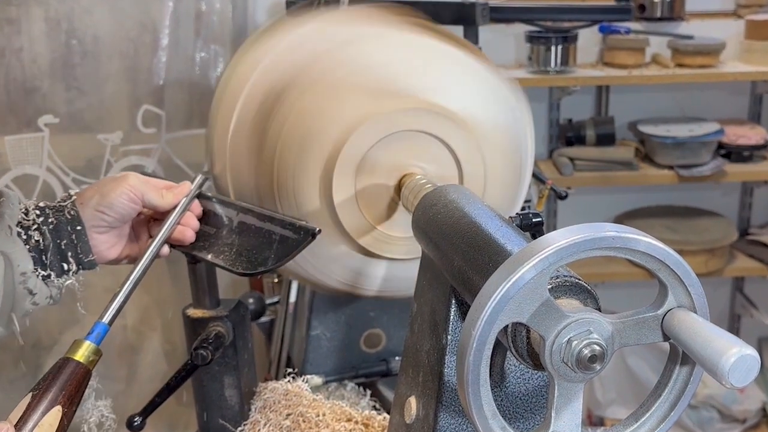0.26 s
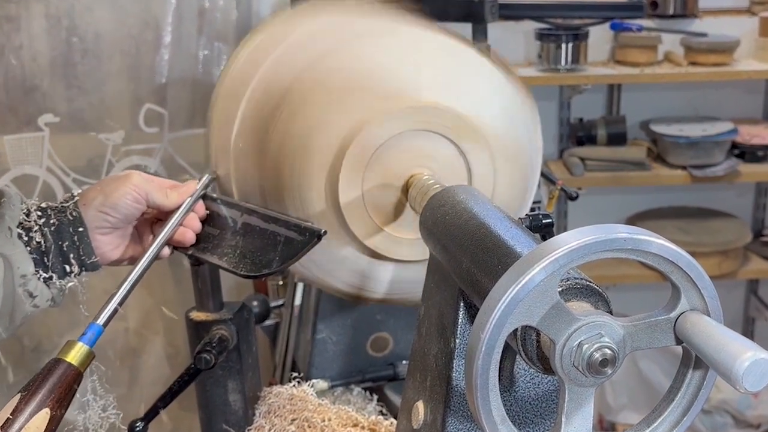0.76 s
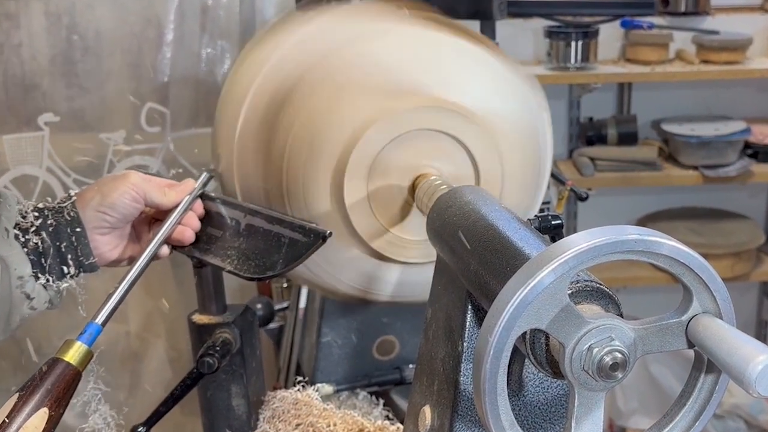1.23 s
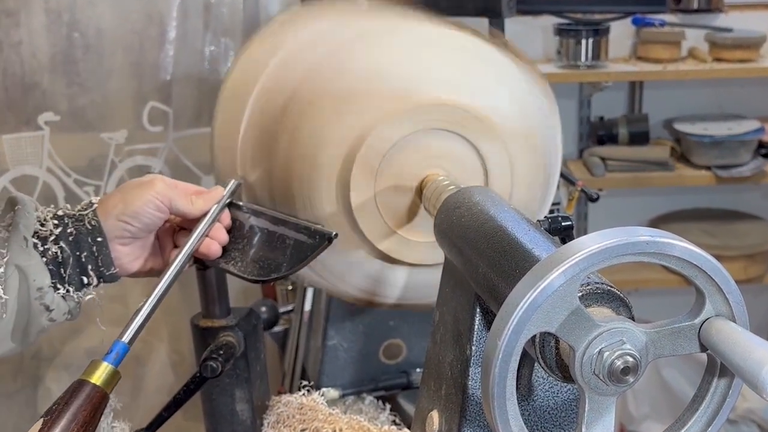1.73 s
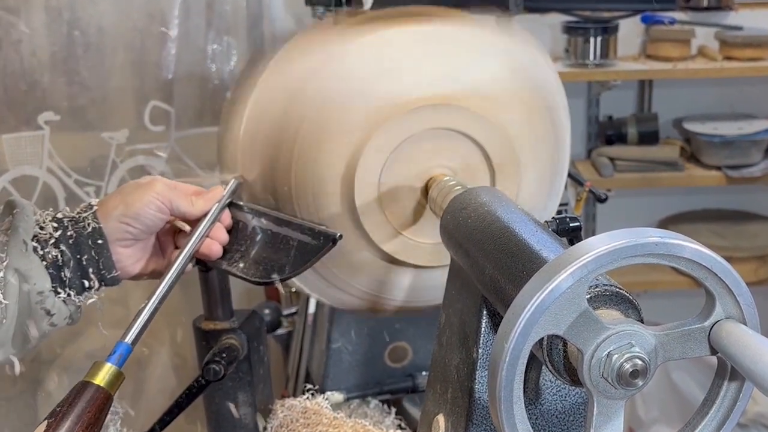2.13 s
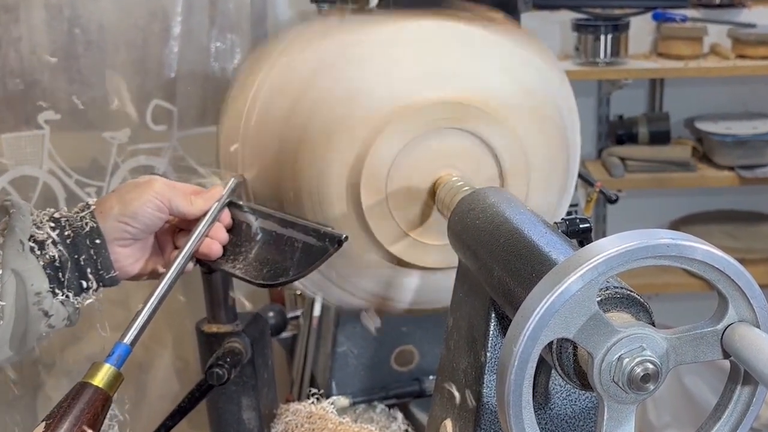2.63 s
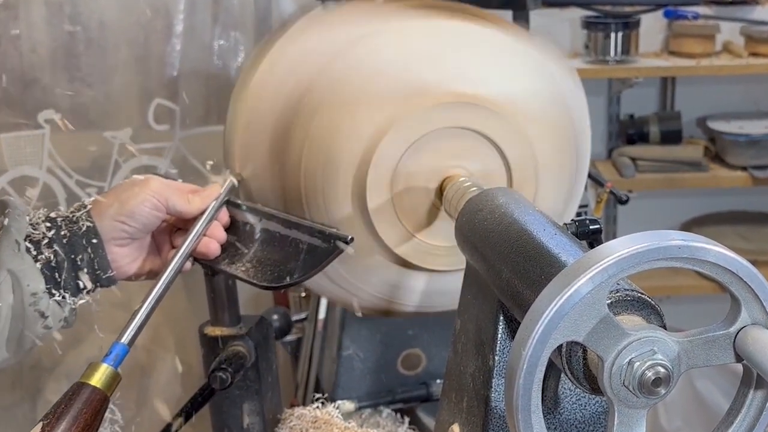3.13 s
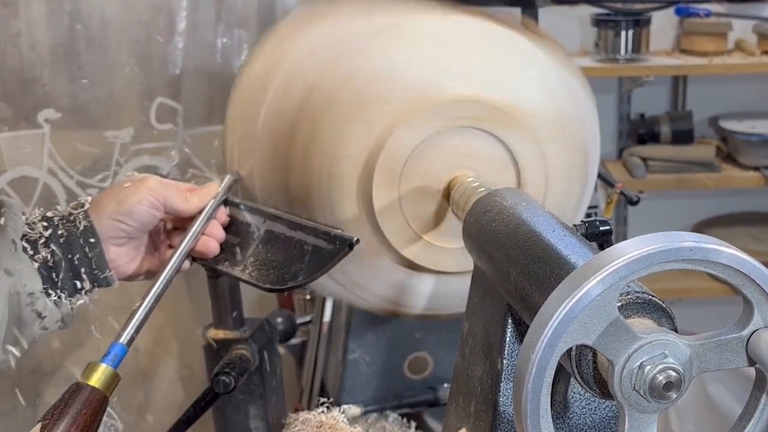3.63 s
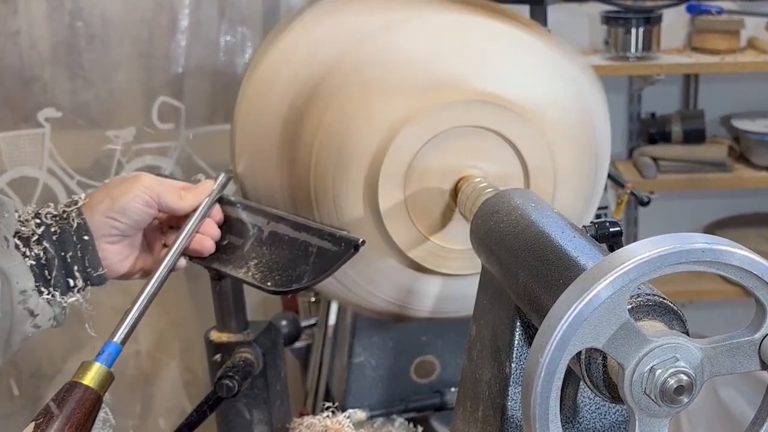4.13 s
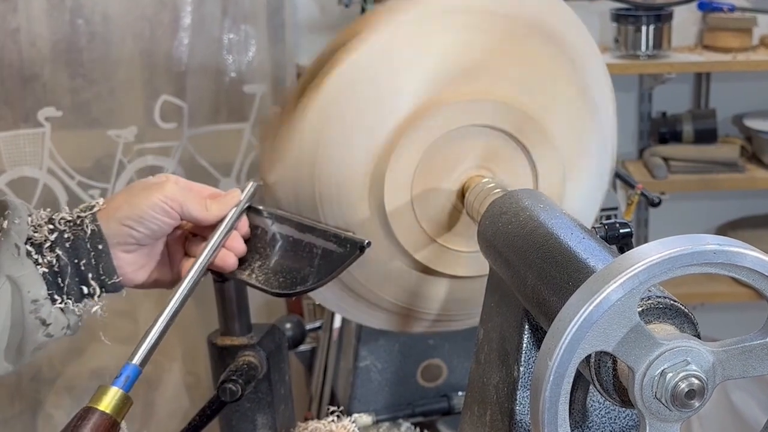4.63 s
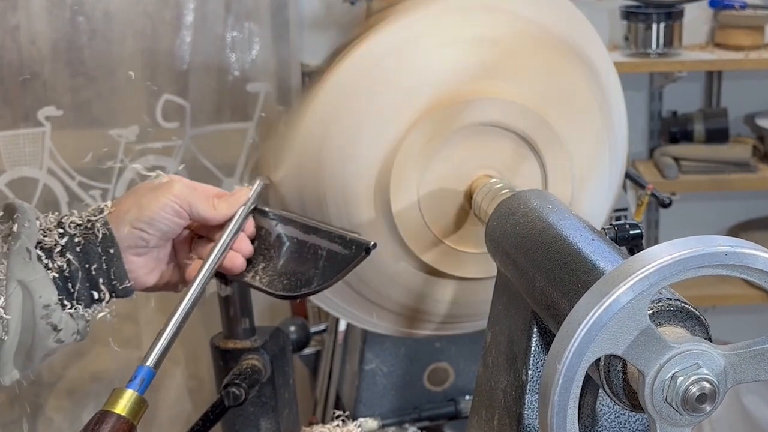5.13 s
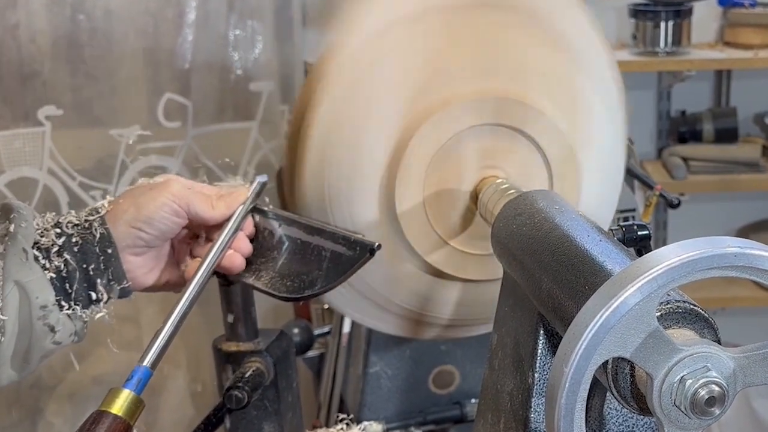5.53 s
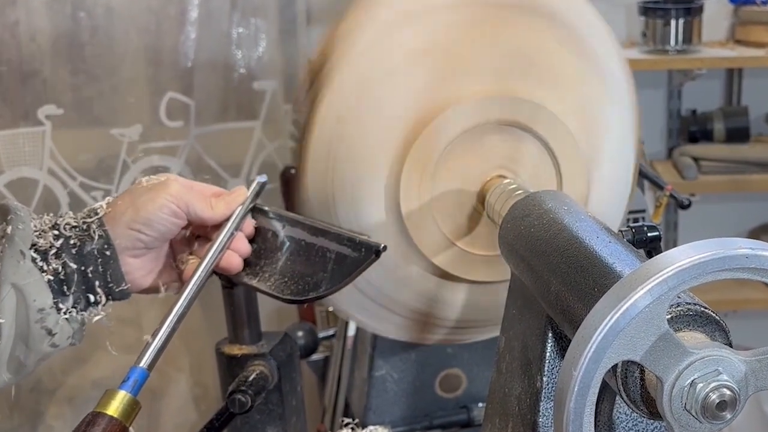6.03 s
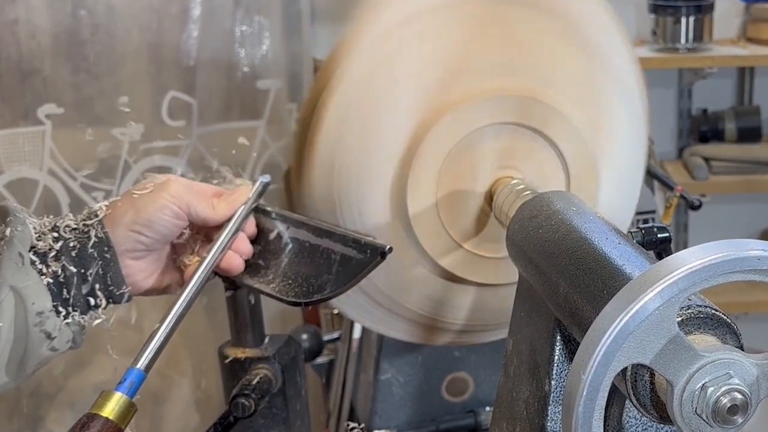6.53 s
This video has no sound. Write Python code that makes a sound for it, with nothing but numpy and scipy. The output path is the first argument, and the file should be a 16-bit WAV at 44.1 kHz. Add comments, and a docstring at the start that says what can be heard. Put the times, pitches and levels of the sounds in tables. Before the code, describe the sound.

In a workshop, a steel gouge cuts an uneven wooden bowl spinning on a lathe. Short, choppy passes with rapid knocking come first. After a brief pause, a longer, louder cut hisses and rasps with a fast flutter, then lighter passes return with bursts of sharp clicks. The tool rest hums and rattles slightly, and a faint motor whine continues underneath. The sound is close and fairly dry.

```python
"""A workshop: a gouge cuts the two wings of a wooden bowl spinning on a lathe.
Each wing enters the edge once a turn, tearing off a hiss of shavings; some entries knock or
catch the grain. The gouge's steel rings, and the tool rest and lathe bed shake along.
Short room echoes follow. Between passes only the motor's whine and whirr remain."""
import sys
import numpy as np
from scipy import signal
from scipy.fft import rfft, irfft
from scipy.io import wavfile
from scipy.ndimage import uniform_filter1d

SR = 44100
rng = np.random.default_rng(int(sys.argv[2]) if len(sys.argv) > 2 else 0)


def master_out(mix):
    """Clip the mix to full scale and print it as 16-bit PCM to the path in sys.argv[1]."""
    frames = np.transpose(np.atleast_2d(mix))
    ceiling = np.clip(frames, -1, 1)
    pcm = np.round(ceiling * 32767).astype(np.int16)
    wavfile.write(sys.argv[1], SR, pcm)


N = 298116
TURN_SAMPLES = 1525
TIME, HZ = np.arange(N) / SR, np.fft.rfftfreq(N, 1 / SR)

# Wings at the edge: t/s, entry 1/turns, entry 2/turns, wing 1 over 2/dB, span/turns, end swell 1/dB
WINGS = [(0, 0.202, 0.866, -14.5, 0.18, 18.5), (.4, 0.13, 0.845, -24, 0.047, 35.5),
         (1.5, 0.49, 0.774, -34, 0.22, 5), (1.85, 0.2, 0.75, 7, 0.19, -26), (2.35, 0.28, 0.75, -1, 0.15, 5),
         (2.9, 0.286, 0.746, -1, 0.233, 12.5), (3.45, 0.27, 0.74, -1.5, 0.12, 7),
         (4.0, 0.257, 0.747, -9, 0.16, 12.5), (4.6, 0.25, 0.75, -53, 0.083, 0),
         (4.8, 0.17, 0.95, 26, 0.22, 18), (5.12, 0.11, 0.63, -5, 0.274, 8),
         (5.4, 0.13, 0.663, 2.5, 0.434, 7.5), (5.8, 0.22, 0.73, -4.5, 0.23, 10),
         (6.76, 0.065, 0.66, 5, 0.24, -6)]


def edge_pressure(entry_db=4.0, second_swell_db=4.0, fade_db_per_turn=23.5):
    """Pressure of each wing on the edge: sharp entry, a swell at the wing's end, then air."""
    first, second, over_db, span, swell_db = curves(WINGS)
    depth = gain_of(0.7 * waver(37.0))
    power = 0
    for entry, db, end_db in ((first, over_db / 2, swell_db), (second, -over_db / 2, second_swell_db)):
        turns = (np.arange(N) / TURN_SAMPLES - entry) % 1
        shape_db = entry_db * np.exp(-turns / 0.29) + end_db * np.exp(-((turns - span) / 0.037) ** 2)
        power += gain_of(db + shape_db - fade_db_per_turn * np.maximum(turns - span, 0)) ** 2
    power = uniform_filter1d(power, size=25)
    return depth * np.sqrt(power / uniform_filter1d(power, size=TURN_SAMPLES))


# Gouge passes, one list each from touch to lift: t/s, level/dB
PASSES = [
    [(0, -48.5), (.17, -48.5), (.245, -46)],
    [(.535, -55), (.59, -49), (.73, -43.5), (.9, -46), (.94, -50), (.99, -60), (1.0, -47.5), (1.07, -48.5),
     (1.21, -41), (1.27, -56.5), (1.31, -48), (1.42, -54)],
    [(1.865, -48), (1.92, -59), (1.94, -43.5), (2.04, -42), (2.25, -39.5), (2.51, -44), (2.61, -41),
     (2.9, -40), (3.2, -40), (3.42, -42), (3.5, -47), (3.7, -45), (3.89, -46.5), (4.1, -50.5), (4.18, -56)],
    [(4.36, -53.5), (4.44, -46.5), (4.53, -57), (4.56, -57), (4.6, -56.5)],
    [(4.87, -67), (4.92, -60), (4.96, -67), (5.01, -59), (5.06, -51.5), (5.35, -45), (5.68, -48),
     (5.74, -52.5)],
    [(5.85, -66), (5.94, -51.5), (5.98, -52.5), (6.01, -48), (6.08, -49), (6.14, -60)],
    [(6.18, -64), (6.23, -64.5), (6.27, -56.5), (6.31, -47), (6.36, -52.5), (6.39, -46.5), (6.64, -49),
     (6.76, -41.5)],
]
# Hiss of shavings: f/Hz, density/dB
SHAVINGS_SPECTRUM = [(710, -62), (1200, -7.5), (1610, -32), (1870, -12), (2760, -4), (5180, -4.5),
                     (7020, 0), (8000, 0), (9310, 2.5), (10900, 2), (16000, 4)]
# Gouge modes under the cut: f/Hz, width/Hz, level/dB
STEEL_MODES = [(2665, 60, 2), (2865, 70, 1), (4330, 350, -3), (6100, 190, 3), (6920, 90, 5), (9130, 120, 8),
               (9400, 90, 6), (9690, 300, 4), (11800, 170, 7), (13050, 150, 2), (13550, 350, 3),
               (15100, 150, 5), (15330, 100, 3), (15680, 200, 8)]


def shavings(pressure, usual_cut_db=-46, crossover_hz=4800):
    """Fibres tear in grains under the edge and ring the steel; low rasp and high sizzle wander apart."""
    level_db, = curves(sum(PASSES, []))
    depth_db = level_db - usual_cut_db
    tear, push = rng.standard_normal((2, 2, N)) * gain_of(1.4 * waver(490.0)) * pressure
    # The steel sings more in a deep cut, less when one wing alone meets it.
    imbalance_db = abs(curves(WINGS)[3])
    steel_db = np.minimum(-4 + 0.3 * depth_db - 0.25 * imbalance_db, 4.5) + 3.1 * waver(72.0)
    cut = tear + coloured(push * gain_of(steel_db) * pressure ** 0.33, modes(STEEL_MODES))
    # A deep cut rasps louder and flutters less.
    rasp_db = np.minimum(-8 + 0.15 * depth_db, -0.5) + 1.1 * waver(30.0)
    smoothing = np.clip(0.23 + 0.3 * depth_db, 0, 0.8)
    smooth_cut = cut / (pressure + 0.2) ** smoothing
    colour = gain_of(spectrum(SHAVINGS_SPECTRUM))
    low_share = 1 / (1 + (HZ / crossover_hz) ** 6)
    sizzle = unit_rms(coloured(cut, colour * np.sqrt(1 - low_share)))
    rasp = unit_rms(coloured(smooth_cut, colour * np.sqrt(low_share)))
    envelope = gain_of(level_db) * contact(rise_s=0.0034, fall_db_per_s=630)
    return envelope * (sizzle + gain_of(rasp_db) * rasp)


def contact(rise_s, fall_db_per_s):
    """Gain that swells at each touch and dies after each lift; the first pass is already under way."""
    t = TIME[::32]
    gains = []
    for k, rows in enumerate(PASSES):
        touch_s, lift_s = rows[0][0], rows[-1][0]
        rise = 1 - (k > 0) * np.exp(-np.maximum(t - touch_s, 0) / rise_s)
        gains.append(rise * gain_of(-fall_db_per_s * np.maximum(t - lift_s, 0)))
    return np.interp(TIME, t, np.max(gains, axis=0))


# Wing strikes on the gouge: t/s, level/dB, final snap f/Hz
KNOCKS = [(0.1335, -48, 4330), (0.205, -39, 4100), (0.236, -20, 4240), (.5466, -49, 4270),
          (0.5812, -38, 4180), (0.615, -47, 4300), (0.6536, -41, 4040), (0.6877, -37, 5270),
          (0.72, -33, 4240), (0.76, -34, 5360), (0.795, -36, 4000), (0.823, -38, 4070), (0.8582, -27, 4170),
          (0.893, -28.5, 4220), (.9963, -39, 4400), (1.034, -35.5, 3500), (1.07, -44, 3750),
          (1.102, -37, 4400), (1.135, -29, 4100), (1.169, -27.5, 5060), (1.206, -27, 4820),
          (1.2737, -33.5, 5300), (1.307, -34, 4350), (1.3428, -32.5, 4240), (1.377, -34, 4330),
          (1.412, -26, 4200), (1.8745, -38, 4480), (1.945, -39, 3660), (2.9183, -32, 4100),
          (3.399, -36, 4380), (3.71, -32, 4340), (4.038, -40, 5300), (4.073, -33, 4010),
          (4.1066, -26.5, 4100), (4.141, -24.5, 5050), (4.176, -37, 4240), (4.367, -36.5, 4400),
          (4.3825, -35, 4200), (4.424, -39, 4300), (4.437, -38, 4240), (4.452, -23.5, 4350),
          (4.4867, -24.5, 4350), (4.5221, -20.5, 4220), (4.8813, -38.5, 4370), (4.9155, -35, 4030),
          (5.019, -37, 4530), (5.053, -32.5, 4640), (5.089, -44, 4400), (5.107, -45, 4300),
          (5.124, -44, 4500), (5.159, -48, 4400), (5.176, -49, 4200), (5.1933, -39.5, 4370),
          (5.211, -53, 4400), (5.227, -43, 4500), (5.332, -44, 4600), (5.368, -43, 4500), (5.47, -49, 4500),
          (5.505, -42, 4400), (5.608, -34, 4540), (5.6248, -35, 4340), (5.642, -28.5, 4370),
          (5.66, -33, 4350), (5.6767, -28.5, 4800), (5.694, -30.5, 4080), (5.712, -27, 4500),
          (5.729, -39, 4270), (6.0053, -37, 4200), (6.022, -28.5, 4530), (6.039, -34, 3940),
          (6.057, -27.5, 4300), (6.074, -26, 4220), (6.091, -30, 4470), (6.282, -49, 4230),
          (6.2992, -32, 4380), (6.385, -37.5, 4300), (6.472, -39, 4440), (6.5579, -36, 4320)]
# Modes of struck gouge and wing: f/Hz, level/dB, t60/s
KNOCK_MODES = [(499.4, -10, .06), (2080, -1, 0.032), (2930, -2, 0.025), (3505, 3, .028), (4075, 6, 0.013),
               (4360, 4, 0.022), (4700, 0, 0.02), (5700, 0, .025), (6700, 1, 0.025), (8220, -4, 0.025)]


def knocks(usual_knock_db=-35, n=4000):
    """A wing hits the gouge: snap, ring of steel and wood, splinters, bright crack and dull thud."""
    out, t = np.zeros(N + n), TIME[:n]
    hz, db, t60_s = np.transpose(KNOCK_MODES)[:, :, None]
    splinter_band = signal.butter(2, [5000, 11000], "bandpass", fs=SR, output="sos")
    thud_band = signal.butter(2, [700, 3200], "bandpass", fs=SR, output="sos")
    for start_s, level_db, snap_hz in KNOCKS:
        spread, detune, phase = rng.standard_normal((3, len(KNOCK_MODES), 1))
        partials = np.sin(2 * np.pi * (hz * (1 + 0.03 * detune) * t + phase))
        ring = (gain_of(db + 3 * spread) * decay(t, t60_s) * partials).sum(0)
        # Treble runs faster along the steel, so the snap falls in pitch.
        snap = np.sin(2 * np.pi * np.cumsum(snap_hz + 1720.0 * np.exp(-t / 0.00026)) / SR)
        snap *= np.exp(-(t / 0.0015) ** 4) + 0.05 * decay(t, 0.02)
        blow = (snap + gain_of(-9.5) * ring / abs(ring).max()) * np.minimum(t / 0.0011, 1)
        # The mix shifts with strength, and with time as the gouge works along the wing.
        strength_db = level_db - usual_knock_db
        splinter_db = -14.5 - 0.3 * strength_db + 1.0 * start_s
        crack_db = -21.5 - 1.77 * strength_db - 4 * start_s
        splinter, crack = rng.standard_normal((2, n)) * (decay(t, 0.013) + 1.57 * decay(t, 0.023))
        blow += gain_of(splinter_db) * signal.sosfilt(splinter_band, splinter)
        blow += gain_of(crack_db) * np.diff(crack, 2, prepend=[0, 0])
        blow += gain_of(-11.5) * decay(t, 0.032) * signal.sosfilt(thud_band, rng.standard_normal(n))
        out[round(start_s * SR):][:n] += gain_of(level_db - 1.0) * blow
    return out[:N]


# Catches in the grain: t/s, level/dB
CATCHES = [(0.5464, -41), (0.5808, -27), (0.6162, -38), (0.6501, -32), (0.685, -34), (0.719, -31),
           (0.7564, -41), (0.7928, -38), (0.8227, -32), (0.8577, -30), (0.8926, -35), (0.996, -23),
           (1.03, -29), (1.0687, -32), (1.1021, -31), (1.1345, -27), (1.1694, -29), (1.2069, -41),
           (1.274, -31), (1.3101, -32), (1.345, -42), (1.377, -42), (1.4119, -43), (1.8743, -43),
           (1.9442, -28), (1.9821, -23), (2.019, -17), (2.0538, -18), (2.0719, -22), (2.0879, -24),
           (2.1523, -20), (2.1916, -15.5), (2.2265, -20), (2.256, -18), (2.2964, -25), (2.3148, -31),
           (2.3308, -21), (2.3652, -20), (2.4176, -26), (2.434, -18.5), (2.469, -25), (2.5034, -36),
           (2.5328, -23), (2.5728, -24), (2.6077, -22), (2.6421, -31), (2.7109, -21), (2.816, -21),
           (2.8491, -20), (2.8831, -23), (2.9185, -25), (2.9534, -26), (2.9883, -25), (3.0217, -37),
           (3.0562, -35), (3.0855, -23.5), (3.1425, -28), (3.1609, -27), (3.2298, -34), (3.2642, -29),
           (3.2986, -33), (3.3679, -32), (3.401, -31), (3.435, -25), (3.575, -43), (3.6214, -30),
           (3.6443, -31), (3.795, -36), (3.8987, -35), (4.0025, -38)]


def catches(rise_s=0.00078, t60_s=0.022, highpass_hz=7850, hiss_db=-10):
    """The edge catches the grain: bursts of tearing ring the steel's upper modes."""
    start_s, level_db = np.transpose(CATCHES)
    t, impulses = TIME[:2000], np.zeros(N)
    impulses[np.round(start_s * SR).astype(int)] = gain_of(level_db)
    bursts = signal.oaconvolve(impulses, np.minimum(t / rise_s, 1) * decay(t, t60_s))[:N]
    colour = (modes(STEEL_MODES) + gain_of(hiss_db)) * highpass(highpass_hz, 6)
    colour /= np.sqrt(np.mean(abs(colour) ** 2))
    return 0.5 * coloured(bursts * rng.standard_normal((2, N)), colour)


# Shake fed in by the cut: t/s, bed level/dB, tool rest level/dB
SHAKE = [(0, -61.5, -68), (.25, -60.5, -54.5), (.6, -54.5, -55.5), (.75, -58, -55), (1.05, -67, -59),
         (1.21, -58.5, -60), (1.42, -63.5, -61.5), (1.9, -77, -59), (2.0, -64.5, -54.5), (2.45, -71, -58.5),
         (2.83, -67, -55.5), (3.05, -76.5, -56), (3.5, -67.5, -58), (3.72, -66.5, -61), (3.9, -63.5, -57.5),
         (4.1, -62.5, -62), (4.45, -55.5, -53), (4.58, -73, -89), (4.9, -84, -79), (5.2, -75, -59.5),
         (5.6, -77, -63.5), (6.0, -80, -62.5), (6.4, -73, -59.5), (6.76, -72.5, -59.5)]
# Bed and tool rest resonances: f/Hz, width/Hz, level/dB
BED_MODES = [(210, 13, 23), (335, 36, -28), (412, 90, -6), (542, 28, 10), (583, 66, -31.5)]
REST_MODES = [(964, 360, 3.5), (1038, 90, 6), (1260, 300, 1), (1320, 390, -2.5)]
# Bed and tool rest hum: multiple of the turn rate, level/dB
BED_TONES = [(5, -23.5), (6, -19), (7, -1), (8, -11), (14, -13)]
REST_TONES = [(10, -26), (11, -20.5), (14, -17.5), (16, -27.5), (17, -21.5), (18, -22.5), (20, -26),
              (21, -20.5), (22, -24), (23, -21), (24, -26.5), (33, -20), (34, -14), (35, -10.5), (36, -11),
              (38, -11.5), (42, -14.5), (44, -21)]


def lathe_shake(pressure, blows, rumble_hz=120):
    """The repeating wood surface drives bed and tool rest; hard knocks add their own shake."""
    bed_db, rest_db = curves(SHAKE)
    weak_bass = highpass(185, 6)  # little radiates below the first mode
    bed = hum(BED_TONES, wander_db=1.0)
    bed += gain_of(-12) * unit_rms(coloured(surface(memory=0.8), modes(BED_MODES) * weak_bass))
    stand_rumble = coloured(rng.standard_normal(N), 1 / (1 + (HZ / rumble_hz) ** 4))
    bed += gain_of(-30) * unit_rms(stand_rumble)
    rest_colour = modes(REST_MODES) * (highpass(900, 8) + 0.3 * weak_bass)
    rest = hum(REST_TONES, wander_db=2.5)
    rest += gain_of(-2.5) * unit_rms(coloured(surface(memory=0.53) * pressure ** 0.33, rest_colour))
    bed_drive = gain_of(bed_db) * contact(rise_s=0.094, fall_db_per_s=230)
    rest_drive = gain_of(rest_db) * contact(rise_s=0.054, fall_db_per_s=482)
    blow_rms = np.sqrt(abs(uniform_filter1d(blows ** 2, size=2500)))
    bed *= np.hypot(bed_drive, gain_of(-28) * blow_rms)
    rest *= np.hypot(rest_drive, gain_of(-18) * blow_rms)
    return bed + rest


def surface(memory):
    """Noise that partly repeats each turn: the edge meets the marks it left the turn before."""
    fresh = rng.standard_normal((N // TURN_SAMPLES + 1, TURN_SAMPLES))
    marks, _ = signal.lfilter([1], [1, -memory], fresh, axis=0, zi=fresh[:1] * 2)
    return unit_rms(marks.ravel()[:N])


def hum(tones, wander_db):
    """Harmonics of the turn, slowly wandering in phase and level."""
    phases = [k * np.arange(N) / TURN_SAMPLES + 0.1 * waver(2.8) + rng.random() for k, _ in tones]
    return sum(np.sqrt(2) * gain_of(db + wander_db * waver(4.8)) * np.sin(2 * np.pi * phase)
               for phase, (_, db) in zip(phases, tones))


# Jolts of the tool on its rest: t/s, level/dB, f/Hz, t60/s
JOLTS = [(0.0478, -47.5, 995, 0.05), (0.1517, -52, 1100, 0.025), (0.2229, -42, 1100, 0.026),
         (0.2368, -41, 1090, 0.035), (0.5662, -43.5, 1030, 0.028), (0.5915, -51, 1010, 0.025),
         (0.604, -50, 1000, 0.028), (0.625, -52, 1020, 0.028), (0.6374, -51, 980, 0.028),
         (0.6724, -48, 1000, 0.025), (0.7063, -43, 1030, 0.032), (0.7412, -39, 1020, 0.025),
         (0.7761, -40, 1040, 0.028), (0.8106, -48, 990, 0.019), (0.844, -42, 1010, 0.02),
         (0.8654, -51, 999, 0.028), (0.8767, -53, 1070, 0.023), (0.9283, -40, 1080, 0.037),
         (0.964, -46, 1110, 0.031), (1.033, -44.5, 976, 0.036), (1.1028, -49, 1016, 0.031),
         (1.137, -44, 1090, 0.022), (1.171, -53, 1110, 0.028), (1.2092, -44.5, 995, 0.023),
         (1.2411, -44.5, 1070, 0.028), (1.3089, -51, 1090, 0.028), (1.3457, -45.5, 1055, 0.028),
         (1.4132, -38.5, 1080, 0.018), (3.7794, -61, 1010, 0.026), (3.8147, -55, 980, 0.026),
         (3.8494, -53, 990, 0.028), (3.8848, -43, 1020, 0.028), (3.9164, -46, 1010, 0.046),
         (3.9529, -47, 1030, 0.028), (4.0118, -51, 996, 0.028), (4.0386, -52, 990, 0.028),
         (4.1078, -38, 1070, 0.055), (4.178, -50, 990, 0.025), (4.3665, -41, 1090, 0.034),
         (4.4023, -46, 1090, 0.026), (4.458, -42, 991, 0.017), (4.4875, -40.5, 1103, 0.036),
         (4.524, -45.5, 1090, 0.028), (4.558, -60, 1080, 0.028), (4.5935, -49, 1070, 0.023),
         (5.6786, -46.5, 1090, 0.033), (6.0753, -47, 1084, 0.023)]


def jolts(rise_s=0.0017, n=2000):
    """The tool jolts on its rest: soft, short bursts of the rest's main mode."""
    out, t = np.zeros(N + n), TIME[:n]
    for start_s, level_db, hz, t60_s in JOLTS:
        swell = (1 - np.exp(-t / rise_s)) ** 2 * decay(t, t60_s)
        burst = swell / swell.max() * np.sin(2 * np.pi * hz * t)
        out[round(start_s * SR):][:n] += gain_of(level_db) * burst
    return out[:N]


# Motor tones: f/Hz, level/dB
WHINE_TONES = [(393.0, -84.5), (1518, -73.5), (1561, -59.5), (1604, -73), (1895, -109), (2756, -79.5),
               (3208, -83), (3871, -106), (4727, -72)]
# Whirr: f/Hz, density/dB
WHIRR_SPECTRUM = [(24, -81), (40, -45), (204, -11.5), (697, -15), (1410, -8.5), (1550, -4.5), (1680, -5.5),
                  (2210, -13), (2770, -13.5), (4130, -19.5), (4570, -12.5), (5050, -16.5), (6170, -15.5),
                  (7000, -24.5), (16000, -35.5)]
# Whirr in stereo: f/Hz, coherence
WHIRR_COHERENCE = [(60, 1), (180, 0.95), (550, 1), (1650, 0.22), (4970, 0.52), (15000, 0.41)]
# Whirr balance: f/Hz, left over right/dB
WHIRR_BALANCE = [(60, 0.5), (240, 0.64), (950, 0.45), (3770, 1.8), (15000, 0.71)]


def motor(whirr_db=-61.5):
    """Wavering tones over the whirr of belt, bearings and air."""
    drifting_s = np.cumsum(1 + 0.00108 * waver(5.44)) / SR
    noise = rng.standard_normal((2, N)) * gain_of(1.64 * waver(27.0))
    whirr = unit_rms(coloured(noise, gain_of(spectrum(WHIRR_SPECTRUM))))
    out = gain_of(whirr_db) * stereo(whirr, WHIRR_COHERENCE, WHIRR_BALANCE)
    # The spindle's turn and rough bearings shake the tones.
    throb_db = 0.21 * np.sin(2 * np.pi * np.arange(N) / TURN_SAMPLES) + 0.82 * waver(83.0)
    side_db, side_lag_rad = np.array([[0.8], [-0.8]]), np.array([[0], [0.9]])
    for hz, db in WHINE_TONES:
        lag_rad = side_lag_rad + 2 * np.pi * rng.random()
        amplitude = np.sqrt(2) * gain_of(db + side_db + 0.11 * waver(9.7) + throb_db)
        out += amplitude * np.sin(2 * np.pi * hz * drifting_s - lag_rad)
    return out


def room_echoes(x, t60_s=0.095, n=12000):
    """Sparse workshop reflections of random sign, a separate set per channel."""
    t = TIME[:n]
    taps = rng.choice([-1., 1.], (2, n)) * (rng.random((2, n)) < 0.05)
    taps *= decay(t, t60_s) * (t > 0.002)
    return signal.oaconvolve(x, taps / np.linalg.norm(taps, axis=1, keepdims=True), axes=1)[:, :N]


def gain_of(db):
    """Decibels to amplitude factor."""
    return 10 ** (np.asarray(db) / 20)


def decay(t, t60_s):
    """Exponential fall, 60 dB per t60_s."""
    return gain_of(-60 * t / t60_s)


def unit_rms(x):
    """Scales to rms 1."""
    return x / np.sqrt(np.mean(x ** 2) + 1e-20)


def spectrum(points):
    """Table interpolated over log frequency."""
    hz, value = np.transpose(points)
    return np.interp(np.log(HZ + 1), np.log(hz + 1), value)


def curves(rows):
    """Table columns interpolated over time."""
    times_s, *columns = np.transpose(rows)
    return [np.interp(TIME, times_s, column) for column in columns]


def modes(table):
    """Summed response of resonances."""
    return sum(gain_of(db) / (1 + 2j * (HZ - hz) / width_hz) for hz, width_hz, db in table)


def highpass(corner_hz, order):
    """Zero-phase high-pass response."""
    return 1 / (1 + (corner_hz / (HZ + 1)) ** order)


def coloured(x, response):
    """Filters the last axis."""
    return irfft(rfft(x) * response, N)


def waver(corner_hz):
    """Low-passed random motion, rms 1."""
    t = TIME[::12]
    hz = np.fft.rfftfreq(len(t), 12 / SR)
    slow = irfft(rfft(rng.standard_normal(len(t))) / (1 + (hz / corner_hz) ** 4), len(t))
    return np.interp(TIME, t, unit_rms(slow))


def stereo(two, coherence, balance, lead_rad=0):
    """Mixes two signals into partly alike left and right channels."""
    left, other = rfft(two)
    alike = np.clip(spectrum(coherence), 0, 1)
    right = alike * left * np.exp(-1j * lead_rad) + np.sqrt(1 - alike ** 2) * other
    tilt = gain_of(spectrum(balance) / 2)
    return irfft([left * tilt, right / tilt], N)


# Cut in stereo: f/Hz, coherence
CUT_COHERENCE = [(60, .98), (550, 0.97), (1400, 0.87), (2600, 0.75), (4500, .85), (8000, 0.7), (15000, 0.8)]
# Cut balance: f/Hz, left over right/dB
CUT_BALANCE = [(60, 3.1), (550, -1.1), (1650, 0.5), (4970, 1), (9000, 3), (15000, 4)]
# Cut phase: f/Hz, left lead/rad
CUT_LEAD = [(500, 0.15), (900, 0.16), (1640, 0.4), (2670, -1.1), (3100, 0.73), (5940, 0.59), (9220, 1.55),
            (11000, 1.68), (12000, 1.1), (16000, 1)]


def scene(echo_lowpass_hz=7800):
    """Cut, knocks and shake with their echoes, over the motor."""
    pressure, blows = edge_pressure(), knocks()
    tool = shavings(pressure) + catches() + blows
    tool += gain_of(-31.0) * room_echoes(np.array([blows, blows]))
    tool += gain_of(-3.5) * coloured(room_echoes(tool), 1 / (1 + 1j * HZ / echo_lowpass_hz))
    lathe = lathe_shake(pressure, blows) + jolts()
    turning = tool + [lathe, room_echoes(lathe[None])[0]]
    return stereo(turning, CUT_COHERENCE, CUT_BALANCE, spectrum(CUT_LEAD)) + motor()


def record(dry):
    """Steep low-pass at 15770 Hz."""
    lowpass = signal.firwin(767, 15770, window=("kaiser", 9), fs=SR)
    return signal.oaconvolve(dry, lowpass[None], "same")


dry = scene()
out = record(dry)
master_out(out)
```